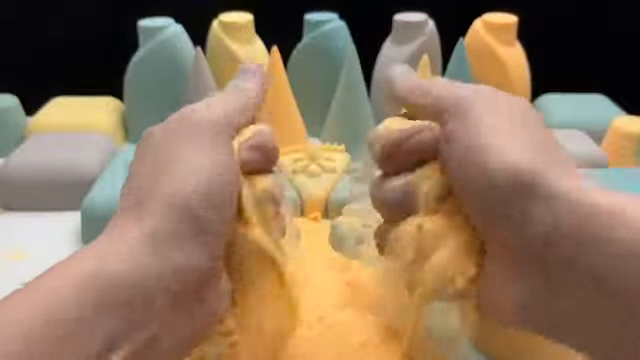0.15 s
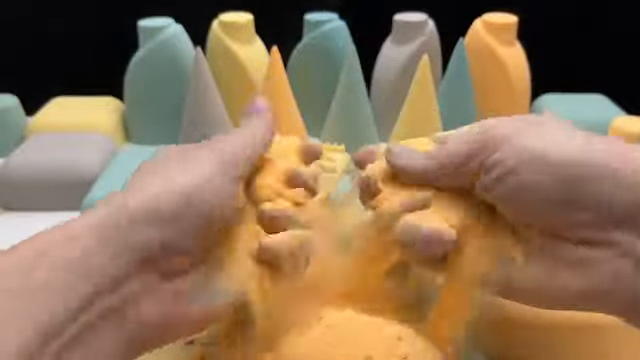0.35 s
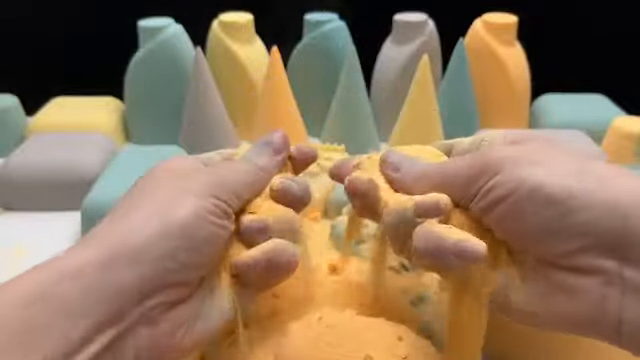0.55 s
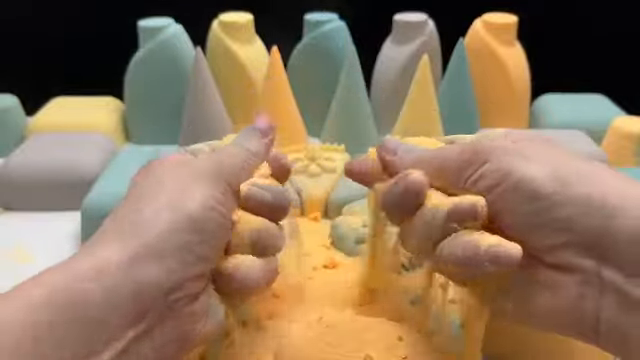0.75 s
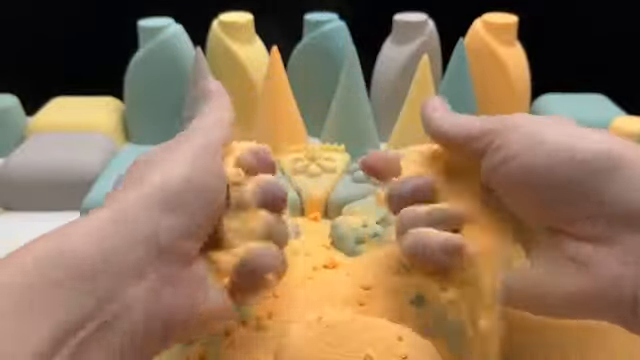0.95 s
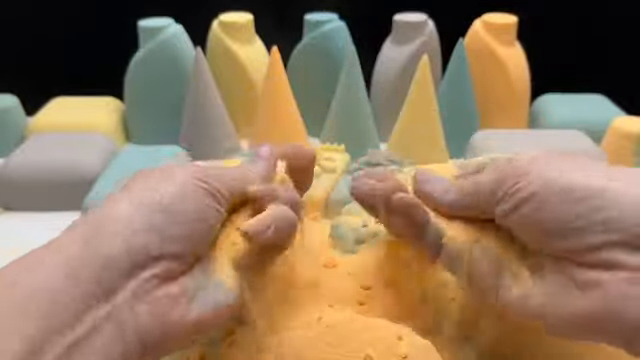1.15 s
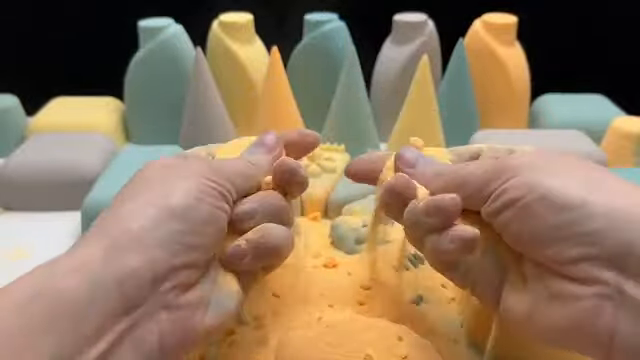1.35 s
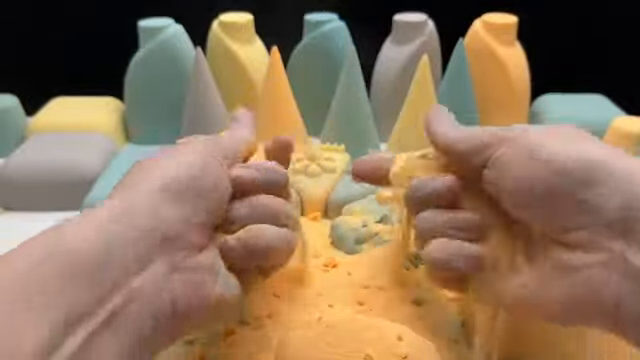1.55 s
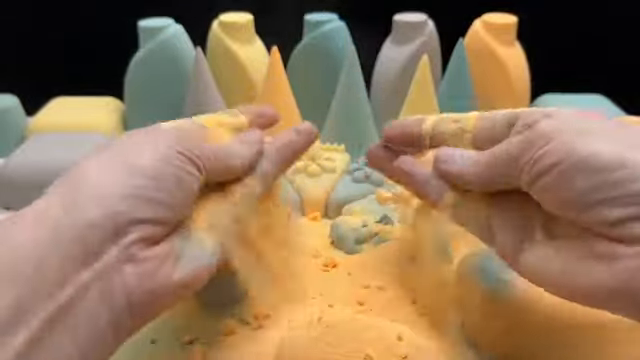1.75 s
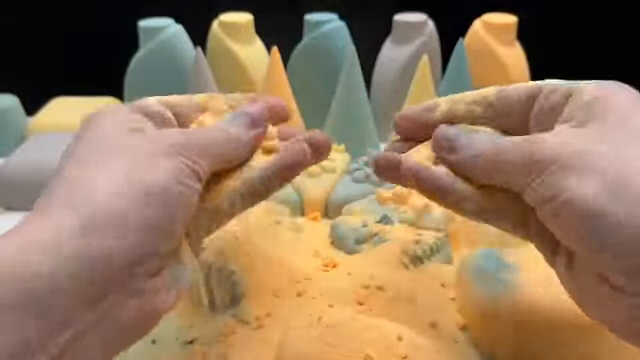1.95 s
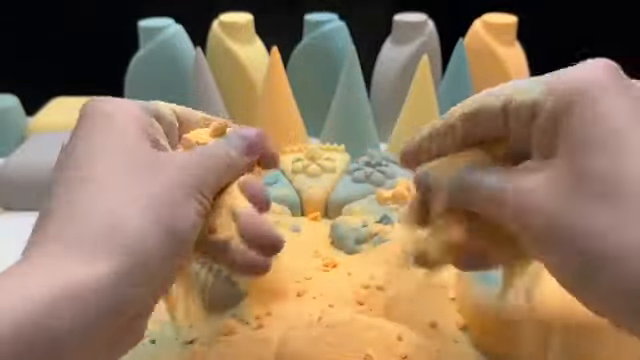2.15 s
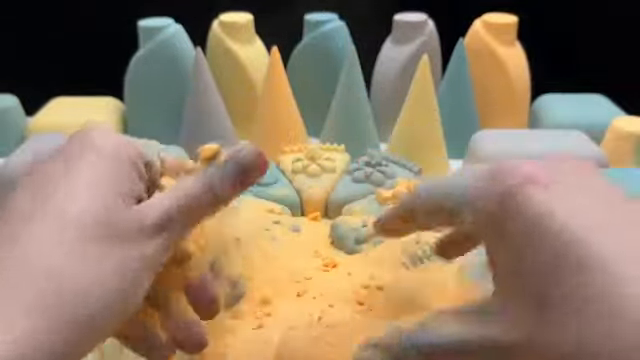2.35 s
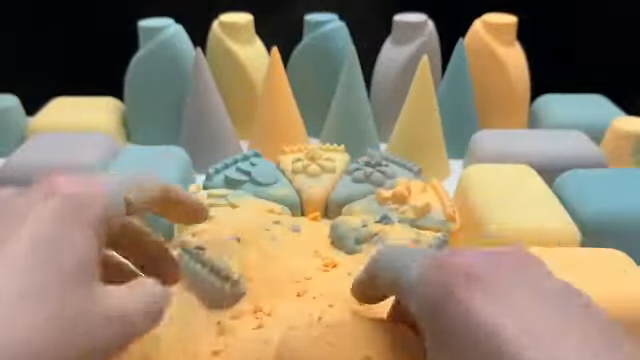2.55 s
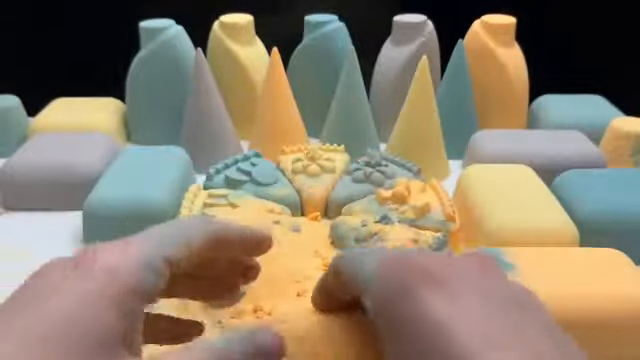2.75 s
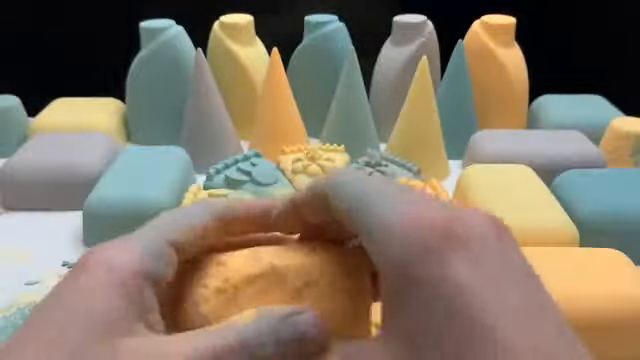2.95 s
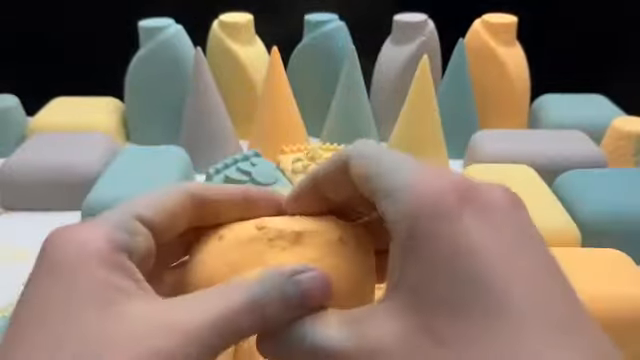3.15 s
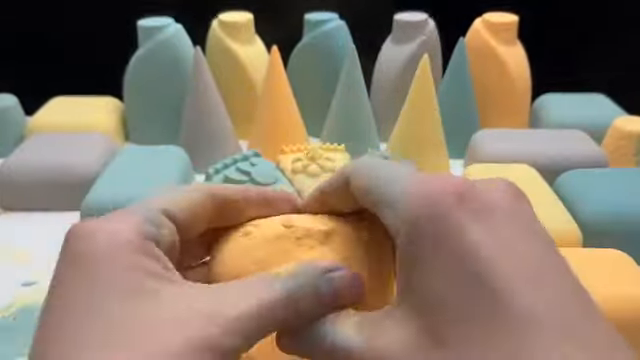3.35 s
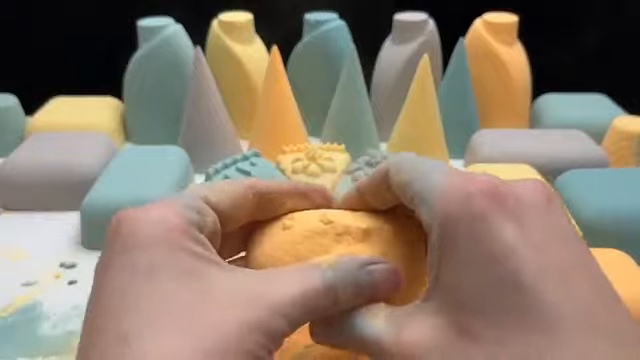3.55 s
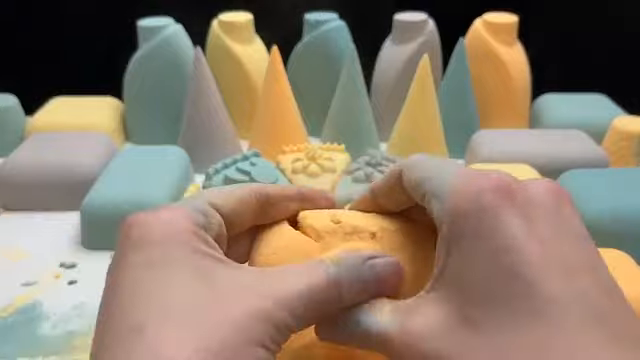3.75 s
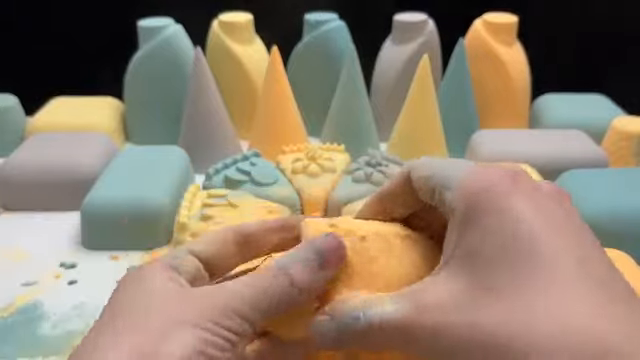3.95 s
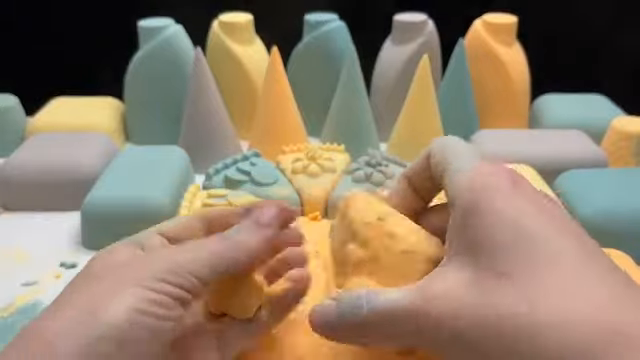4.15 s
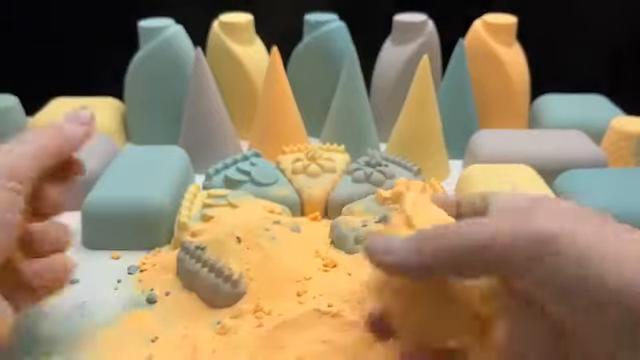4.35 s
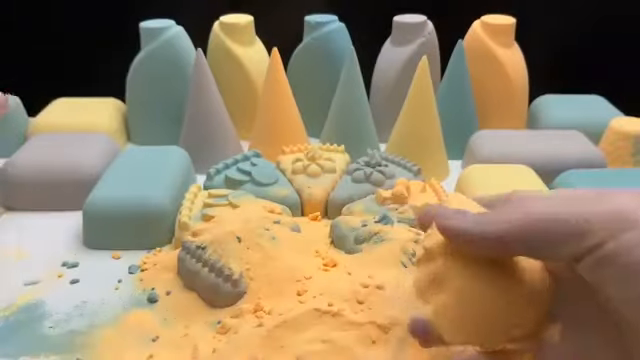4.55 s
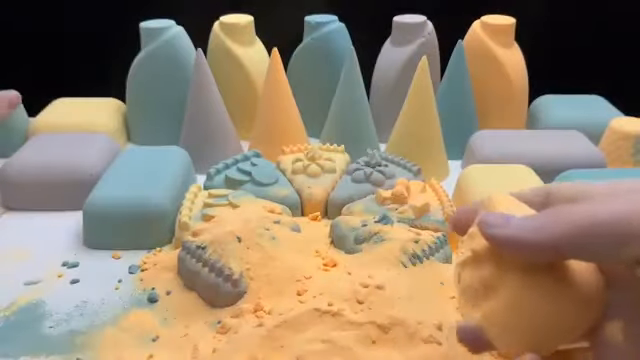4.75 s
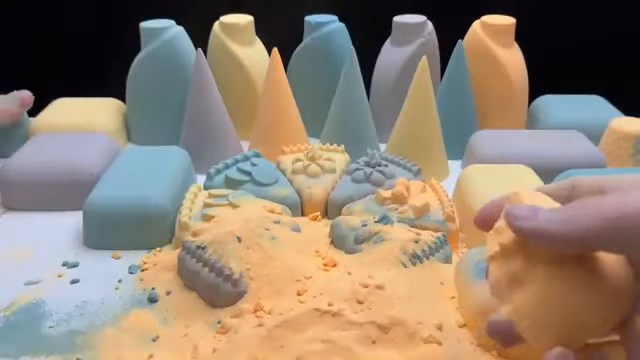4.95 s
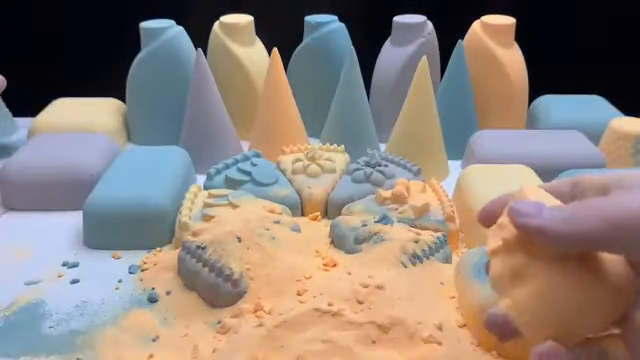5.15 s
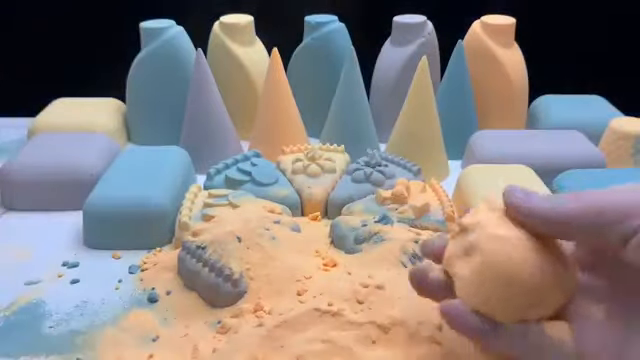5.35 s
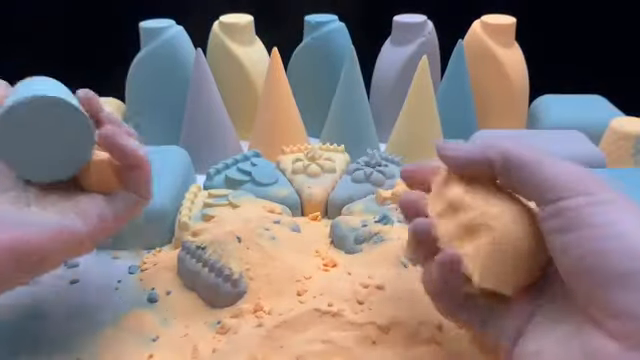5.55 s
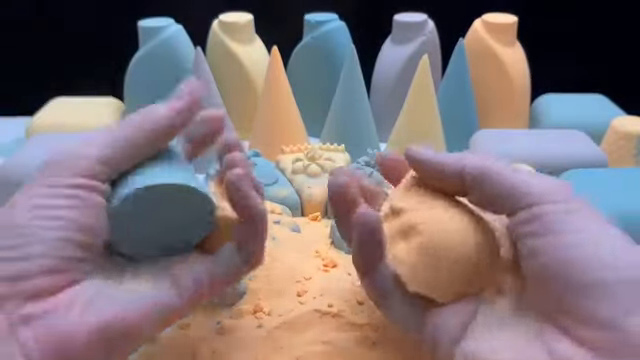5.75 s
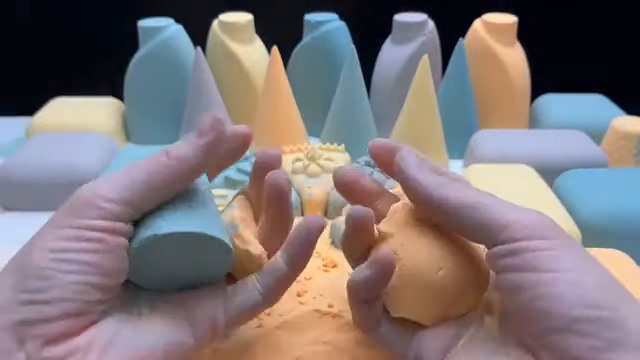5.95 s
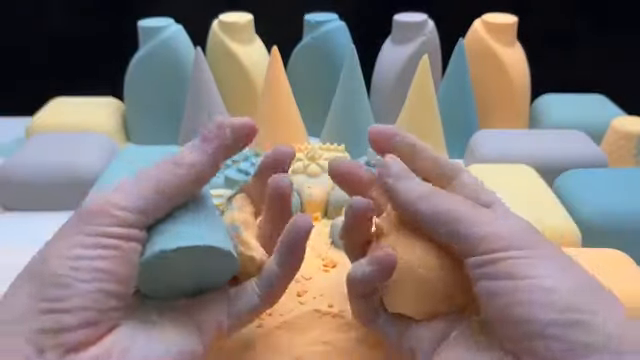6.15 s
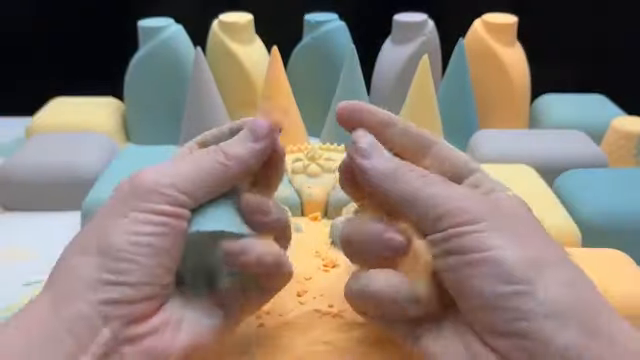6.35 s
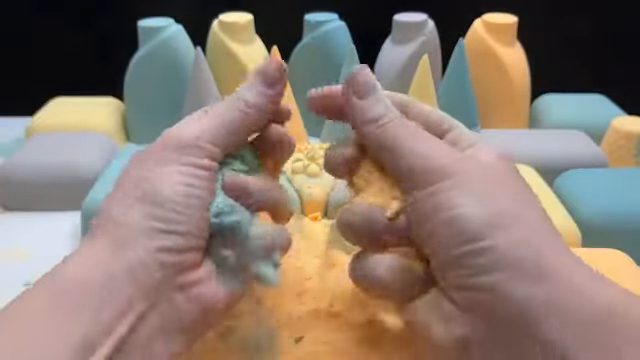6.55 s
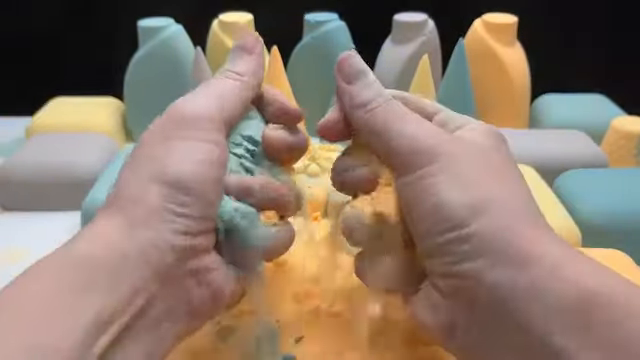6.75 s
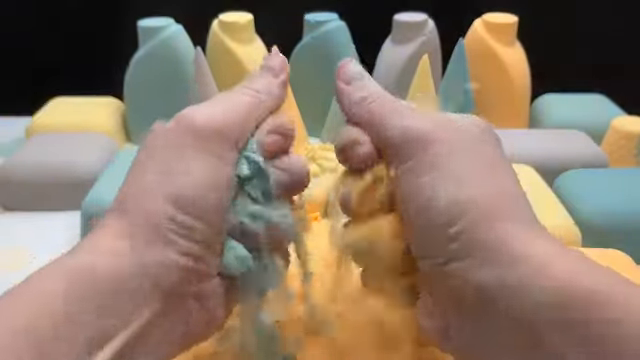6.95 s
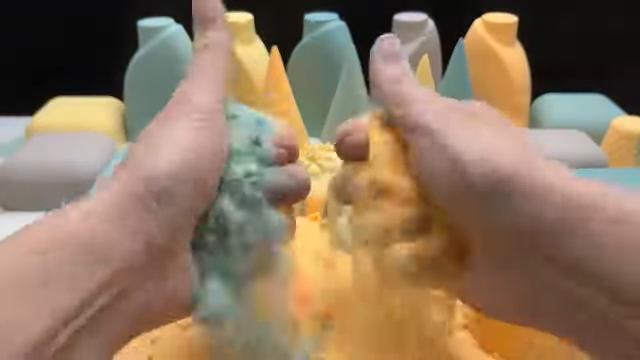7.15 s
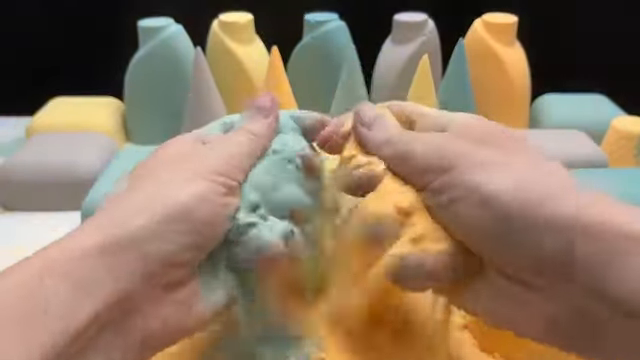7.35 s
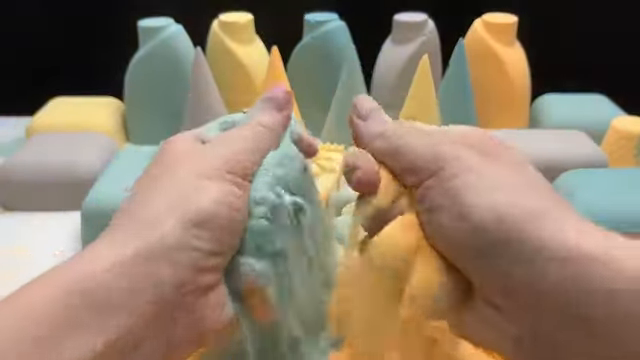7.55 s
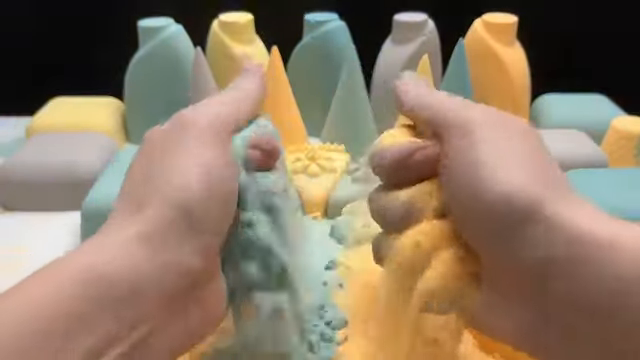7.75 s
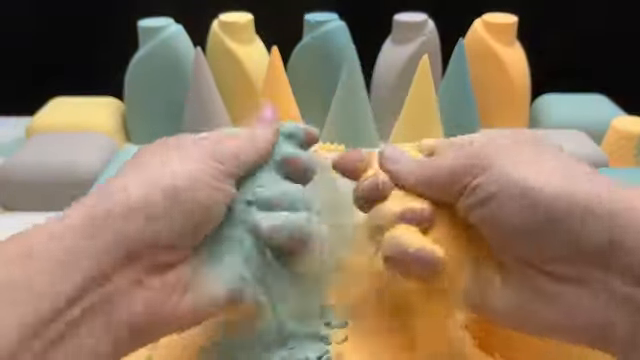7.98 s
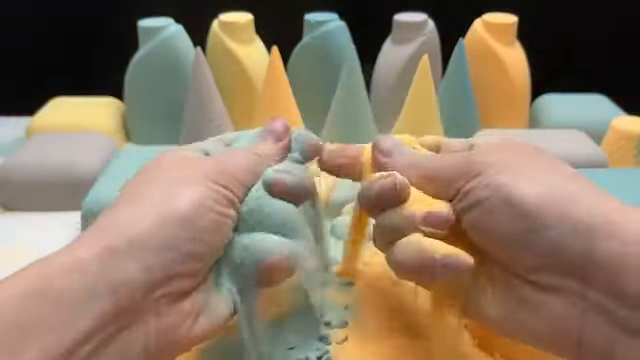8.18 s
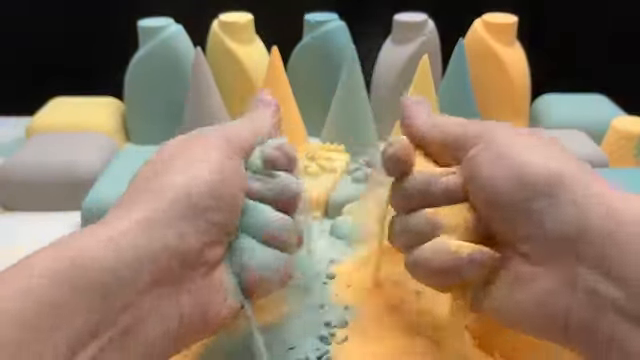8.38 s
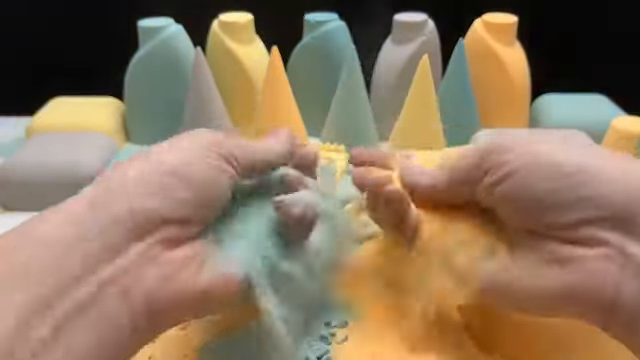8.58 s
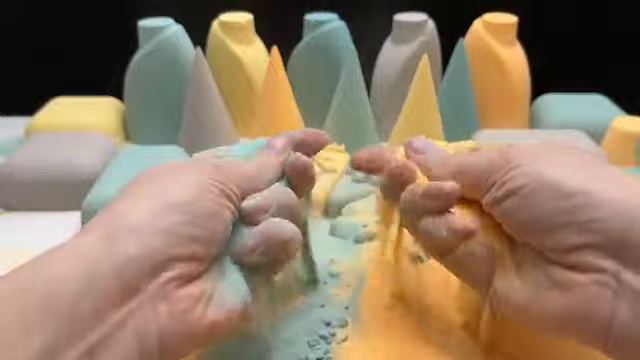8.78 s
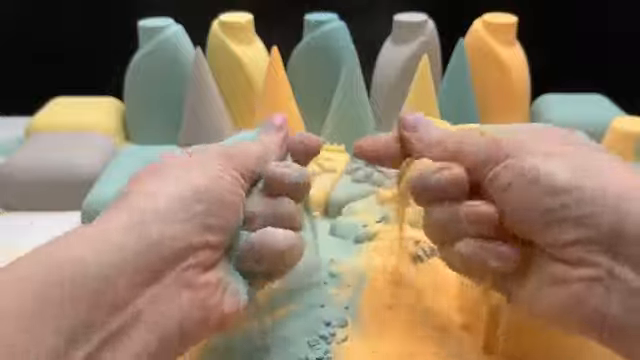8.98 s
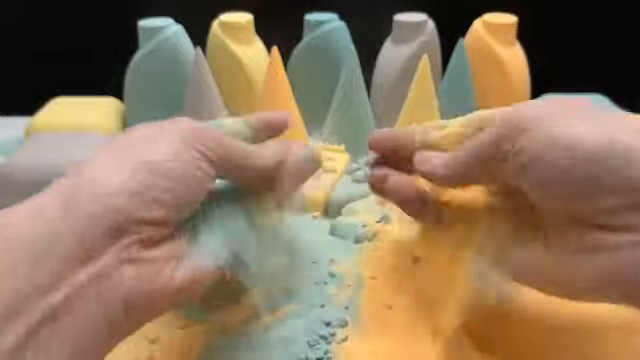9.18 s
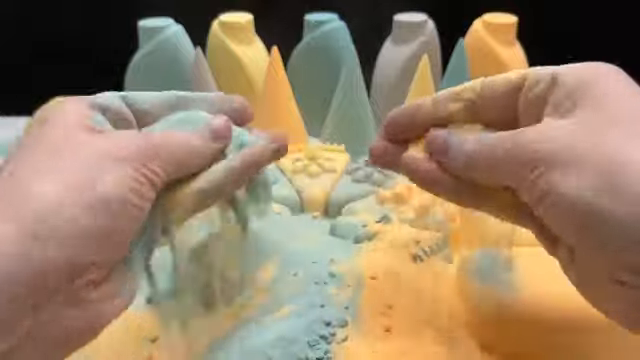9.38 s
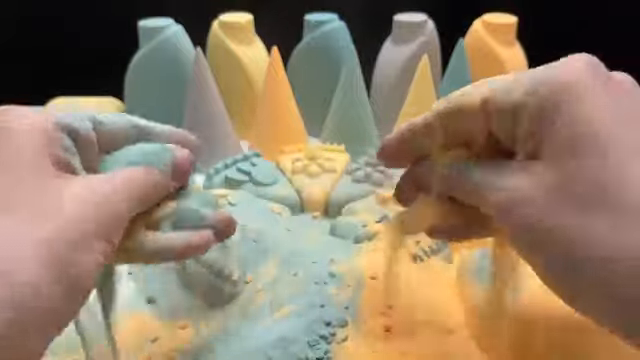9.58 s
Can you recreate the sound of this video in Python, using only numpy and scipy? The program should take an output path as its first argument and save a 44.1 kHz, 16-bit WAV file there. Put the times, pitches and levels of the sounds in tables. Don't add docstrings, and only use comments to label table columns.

```python
import sys
import numpy as np
from scipy import signal
from scipy.fft import rfft, irfft, next_fast_len
from scipy.io import wavfile
from scipy.ndimage import uniform_filter1d

SR = 44100
rng = np.random.default_rng(int(sys.argv[2]) if len(sys.argv) > 2 else 0)


def put_to_file(sound):
    columns = np.atleast_2d(sound).T
    safe = np.clip(columns, -1, 1)
    whole_steps = np.round(safe * 32767)
    wavfile.write(sys.argv[1], SR, whole_steps.astype(np.int16))


def ratio_of_db(decibels):
    return 10 ** (np.asarray(decibels, float) / 20)


N = 424241
SIZE = next_fast_len(N + SR)
HZ = np.arange(SIZE // 2 + 1) * SR / SIZE + 1e-3

# [f/Hz, level/dB per Hz]
CRUMB_TONE = [(90, -16), (150, -11.5), (260, -2), (500, -8), (800, -9), (1200, -12)]


def rms_one(x):
    return x / np.sqrt(np.mean(x ** 2) + 1e-20)


def colour(x, spectrum):
    hz, db = np.transpose(spectrum)
    shape_db = np.interp(np.log(HZ), np.log(hz), db)
    octaves_below = np.maximum(np.log2(hz[0] / HZ), 0)
    octaves_above = np.maximum(np.log2(HZ / hz[-1]), 0)
    gain = ratio_of_db(shape_db - 11.5 * (octaves_below + octaves_above))
    return rms_one(irfft(rfft(x, SIZE) * gain, SIZE)[:N])


def drift(rate):
    r = np.exp(-80 * np.pi * rate / SR)
    noise = rng.standard_normal(N // 40 + 2002)
    slow = rms_one(signal.lfilter([1], [1, -2 * r, r * r], noise)[2000:])
    return np.interp(np.arange(N) / 40, np.arange(len(slow)), slow)


def grains(per_s, spread_db, clump_db, clump_rate):
    sizes = ratio_of_db(spread_db * np.minimum(rng.exponential(1, N), 5))
    signs = rng.choice([-1, 1], N)
    happens = rng.random(N) < per_s / SR
    return sizes * signs * happens * ratio_of_db(clump_db * drift(clump_rate))


def knock(start_hz, end_hz, fall_s, decay_s):
    t = np.arange(SR // 30) / SR
    hz = end_hz + (start_hz - end_hz) * np.exp(-t / fall_s)
    soft_start = 1 - np.exp(-4 * t / fall_s)
    return np.sin(2 * np.pi * np.cumsum(hz) / SR) * np.exp(-t / decay_s) * soft_start


def struck(modes, luck):
    t = np.arange(SR // 12) / SR
    hz, db, t60 = np.transpose(modes)[:, :, None]
    luck = luck[:len(modes), None]
    fading = ratio_of_db(db + 6 * luck - 60 * t / t60)
    ring = (fading * np.sin(2 * np.pi * hz * (1 + 0.08 * luck) * t)).sum(0)
    return ring / np.abs(ring).max()


def twin(x):
    return np.array([x, np.roll(x, N // 3)])


def strokes(s, lasts_s, db, rise, fall, rest_db, builds_db=0):
    t = np.arange(0, N + 64, 64) / SR
    s, lasts_s, db = (np.reshape(c, (-1, 1)) for c in (s, lasts_s, db))
    before = np.maximum(s - t, 0)
    after = np.maximum(t - s - lasts_s, 0)
    shape_db = db - rise * before - fall * after
    shape_db = shape_db - builds_db * np.clip(1 - (t - s) / lasts_s, 0, 1)
    total_db = 10 * np.log10(ratio_of_db(2 * shape_db).sum(0) + ratio_of_db(2 * rest_db))
    return np.interp(np.arange(N) / SR, t, total_db)


def add_db(one_db, other_db):
    return 10 * np.log10(ratio_of_db(2 * one_db) + ratio_of_db(2 * other_db))


def hands():
    # [t/s, crushing lasts/s, pouring lasts/s, crunch level/dB, powder level/dB]
    squeezes = [(0.018, 0.14, 0.25, -45.5, -43), (0.364, 0.17, 0.038, -61, -50.5),
                (0.588, 0.16, 0.33, -44, -43.5), (1.301, 0.091, 0.25, -45.5, -44.5),
                (1.918, 0.12, .2, -48, -45.5), (2.27, 0.038, .02, -63.5, -70),
                (3.403, 0.062, 0.049, -67.5, -62.5), (5.09, 0.04, .02, -62, -75),
                (6.335, .14, 0.17, -47.5, -41.5), (6.544, 0.42, 0.52, -43, -40.5),
                (7.164, 0.16, 0.1, -55, -50), (7.396, 0.27, .16, -47, -43),
                (7.621, 0.11, 0.18, -42.5, -39.5), (8.173, 0.2, 0.31, -45.5, -44.5),
                (8.778, 0.18, .31, -47.5, -43.5), (9.373, 0.068, 0.041, -61.5, -52),
                (9.487, 0.021, 0.24, -54, -47.5)]
    # [t/s, lasts/s, friction level/dB, dust level/dB]
    touches = [(1.167, 0.077, -49, -58.5), (1.812, 0.056, -49, -57.5), (2.709, 0.1, -56.5, -58),
               (3.036, 0.12, -62.5, -53.5), (3.261, 0.2, -63.5, -54), (3.601, 0.019, -50.5, -54),
               (3.677, 0.092, -62, -61.5), (3.843, 0.026, -50, -50), (3.916, 0.077, -58.5, -59),
               (4.096, 0.072, -69, -62), (4.213, 0.045, -60.5, -50), (4.307, .07, -60, -59.5),
               (4.625, 0.034, -69, -62), (4.9, 0.14, -72, -71.5), (5.097, 0.039, -48, -57),
               (5.221, 0.066, -67, -56), (5.449, 0.03, -55, -49.5), (5.578, .06, -50, -44.5),
               (5.692, 0.13, -59, -49), (5.843, 0.22, -65.5, -58), (6.2, 0.15, -68, -50),
               (6.392, 0.034, -32.5, -42.5), (7.906, 0.11, -52.5, -57.5), (8.063, 0.027, -53, -64),
               (0.518, 0.047, -47, -59), (2.162, 0.13, -45, -47), (4.477, 0.054, -68, -66.5)]
    # [t/s, lasts/s, level/dB]
    leans = [
        (1.75, 0.12, -55),
        (4.054, 0.051, -50),
        (4.793, 0.47, -58),
        (6.377, 0.66, -46.5),
    ]
    s, crush_s, pour_s, crunch_db, powder_db = np.transpose(squeezes)
    touch_s, touch_lasts_s, touch_db, touch_dust_db = np.transpose(touches)
    lean_s, lean_lasts_s, lean_db = np.transpose(leans)

    crunch_level = strokes(s, crush_s, crunch_db, rise=230, fall=90, rest_db=-69.5)
    rasp = strokes(s, crush_s, crunch_db - 4, rise=230, fall=122, rest_db=-94)
    touch = strokes(touch_s, touch_lasts_s, touch_db, rise=263, fall=179, rest_db=-78)
    touch_dust = strokes(touch_s, touch_lasts_s, touch_dust_db, rise=263, fall=179, rest_db=-69.5)
    pour = strokes(s, pour_s, powder_db, rise=202, fall=103, rest_db=-120)
    pour_dust = strokes(s, pour_s, powder_db - 3.5, rise=202, fall=103, rest_db=-120, builds_db=3)
    rumble = strokes(np.r_[s, lean_s], np.r_[crush_s, lean_lasts_s], np.r_[crunch_db - 1.5, lean_db],
                     rise=102, fall=61.5, rest_db=-61)
    return crunch_level, rasp, add_db(pour, touch), add_db(pour_dust, touch_dust), rumble


def steady_floor():
    # [f/Hz, level/dB per Hz]
    floor_tone = [(59, -19), (100, -12), (151, 8), (266, -7.5), (1120, -64), (4110, -31), (4650, -8.5),
                  (7000, -66), (9100, -65), (15400, -120)]
    return ratio_of_db(-72) * twin(colour(rng.standard_normal(N), floor_tone))


def table_rumble(rumble_db):
    # [f/Hz, level/dB per Hz]
    hum_tone = [(15, -30), (25, -24), (48, 1), (70, 4), (102, -3), (130, -11), (160, -13.5), (210, -41),
                (350, -120)]
    return ratio_of_db(rumble_db) * twin(colour(rng.standard_normal(N), hum_tone))


def rubs():
    # [t/s, half length/s, body level/dB, hollow-palm whistle level/dB]
    rub_strokes = [
        (2.759, 0.067, -54.5, -82),
        (5.13, 0.03, -73, -54),
    ]
    # [f/Hz, level/dB per Hz]
    rub_tone = [(300, -5), (500, 4), (1000, 0), (1500, -1)]
    palm_hz, palm_width_hz = 1694, 52
    t, noise = np.arange(N) / SR, rng.standard_normal(N)
    body = colour(noise, rub_tone)
    r = np.exp(-np.pi * palm_width_hz / SR)
    palm = rms_one(signal.lfilter([1], [1, -2 * r * np.cos(2 * np.pi * palm_hz / SR), r * r], noise))
    out = 0
    for s, half_s, body_db, palm_db in rub_strokes:
        stroke = np.exp(-((t - s) / half_s) ** 2)
        linger = np.where(t < s, stroke, np.exp(-np.abs(t - s) / 0.051))
        out = out + ratio_of_db(body_db) * stroke * twin(body) + ratio_of_db(palm_db) * linger * twin(palm)
    return out


def lone_clicks():
    # [t/s, level/dB]
    ticks = [
        (2.53, -44.5),
        (3.426, -50),
        (3.455, -50),
        (3.571, -38),
        (3.6071, -32),
        (6.296, -27),
    ]
    t = np.arange(N) / SR
    shape = sum(ratio_of_db(db) * (t > s) * np.exp(-np.abs(t - s) / 0.0025) for s, db in ticks)
    return twin(rng.standard_normal(N)) * shape


def patchy(x, patch_db, rate):
    patch_edges = [2500, 3000, 3600, 4300, 5000, 5600, 6300, 7000]
    lows = [signal.sosfilt(signal.butter(2, hz, fs=SR, output="sos"), x) for hz in patch_edges]
    bands = np.diff([0 * x, *lows, x], axis=0)
    return rms_one(sum(band * ratio_of_db(patch_db * drift(rate)) for band in bands))


def powder(friction_db, dust_db):
    # [f/Hz, level/dB per Hz]
    friction_tone = [(1200, -14.5), (1700, -2.5), (2200, -1), (3300, -1), (5000, -3.5), (7000, -6.5),
                     (8500, -14), (10000, -8)]
    # [f/Hz, level/dB per Hz]
    dust_tone = [(6500, -6.5), (8500, 1), (10000, -4), (12000, -4.5), (14000, -4.5), (15200, -7)]
    grit = rms_one(grains(5000, 2.5, 1.8, 37)) + 0.88 * rng.standard_normal(N)
    friction = twin(patchy(colour(grit, friction_tone), patch_db=4.2, rate=3)) * ratio_of_db(friction_db - 1.5)
    dust = twin(colour(grit, dust_tone)) * ratio_of_db(dust_db + 4.0 + 1.7 * drift(20))
    return friction + dust


def crunch(crunch_db, rasp_db):
    # [f/Hz, level/dB per Hz]
    rasp_tone = [(500, -12.5), (800, -0.5), (1200, -12), (1700, 0.5), (2200, -6)]
    force = np.clip((crunch_db + 73.0) / 14, 0, 1)
    grind = twin(colour(rng.standard_normal(N), CRUMB_TONE)) * ratio_of_db(3.5 * force * drift(25))
    pops = 0
    for size in (.6, .9, 1.4, 2.1):
        small = knock(1600 / size, 330 / size, 0.0012 * size, 0.0026 * size)
        pops = pops + signal.oaconvolve(grains(60, 1.3, 2.1, 39), small)[:N]
    rasp_grit = rms_one(grains(900, 1.7, 9.4, 49)) + 2.25 * rng.standard_normal(N)
    rasp = colour(rasp_grit, rasp_tone)
    low = 0.85 * grind + 0.49 * force * twin(rms_one(pops))
    return ratio_of_db(crunch_db + 3.0) * low + ratio_of_db(rasp_db + 1.5) * twin(rasp)


def splinters(rasp_db):
    # [f/Hz, level/dB per Hz]
    splinter_tone = [(500, -17), (900, 8), (2000, 9), (3300, -6), (5000, -24)]
    force = np.clip((rasp_db + 78) / 14, 0, 1)
    clicks = colour(grains(220, 4, 3, 25), splinter_tone)
    return ratio_of_db(rasp_db - 4.0) * force * twin(clicks)


def one_crack(snap_db, knock_db, hz, thud_db, chance):
    # [f/Hz, level/dB, time to fall 60 dB/s]
    thud_modes = [(116, -3.5, 0.067), (158.3, -1.5, 0.089), (236.3, 0, 0.084), (310, -3, 0.16),
                  (369, -8, 0.044), (469, -22, 0.3)]
    # [f/Hz, level/dB, time to fall 60 dB/s]
    snap_modes = [(1785, 1.5, 0.007), (2250, 3, 0.006), (2880, 3, 0.004), (3730, -4, 0.002),
                  (4730, -12, 0.0026), (11000, -11, .003)]
    thud = ratio_of_db(thud_db - 3.0) * struck(thud_modes, 0.6 * chance[8:])
    t = np.arange(len(thud)) / SR
    thud = thud * (1 - np.exp(-t / 0.0017))
    ring = ratio_of_db(snap_db + 13) * struck(snap_modes, 0.65 * chance) * (1 - np.exp(-t / 0.00023))
    fall = ratio_of_db(knock_db + 2.5) * knock(3.3 * hz, 0.723 * hz, 0.52 / hz, 1.3 / hz)
    fall = fall + ratio_of_db(snap_db - 0.6) * knock(3600 * 2 ** (.22 * chance[7]), 1500, .0008, .0011)
    fall = fall + ratio_of_db(thud_db - 6) * knock(602, 126.5, 0.00397, 0.016)
    return ring + np.pad(fall, (0, len(t) - len(fall))) + thud


def cracks():
    # [t/s, snap level/dB, knock level/dB, thud level/dB]
    lumps = [(.1046, -24.5, -27, -30), (.1227, -22, -17, -25.5), (.5852, -35, -22, -15),
             (.6673, -21, -17.5, -17), (6.2965, -45, -31, -36.5), (1.2907, -21, -21.5, -20),
             (1.3432, -21.5, -22, -31.5), (1.3634, -24, -23, -25.5), (1.379, -22.5, -45, -26),
             (1.9182, -17, -30.5, -30), (3.6065, -19, -20.5, -29), (6.3674, -25.5, -21, -25.5),
             (6.534, -25, -20, -22.5), (6.6016, -20, -18.5, -27), (6.7448, -23.5, -19.5, -15.5),
             (6.7644, -20.5, -18, -33), (6.8229, -16, -26, -11.5), (6.8278, -19, -14.5, -21),
             (6.8581, -12, -21, -12), (6.8745, -18, -16, -27), (6.957, -21.5, -33, -16.5),
             (6.98, -24.5, -26, -32), (7.6961, -26, -17, -25.5), (7.7915, -22.5, -18.5, -22),
             (8.1591, -26.5, -17.5, -19), (8.2115, -37, -20, -25), (8.224, -32, -26, -21),
             (8.2454, -26.5, -21, -24), (8.77, -16, -14.5, -21), (8.8701, -24.5, -23, -25)]
    # [t/s, snap level/dB, knock level/dB]
    chips = [(0.0489, -35, -29), (6.437, -26, -25), (.6256, -51, -35), (.6517, -40, -28), (.7028, -39, -38),
             (.7104, -28.5, -35), (1.9776, -31, -31), (1.9842, -29, -24), (2.0192, -29, -27),
             (6.7984, -39, -25), (6.3896, -19, -15.5), (6.4119, -24, -20), (6.6471, -24.5, -22.5),
             (6.684, -33, -21.5), (6.7824, -23.5, -19), (6.8954, -23, -22.5), (6.9498, -24, -24.5),
             (7.4224, -42, -30), (7.5479, -29.5, -23), (7.643, -23.5, -23.5), (7.6505, -22, -22),
             (7.7437, -40, -19.5), (8.309, -26.5, -23), (8.798, -22, -22.5), (8.8077, -33, -26),
             (8.8277, -26.5, -47), (8.9434, -27, -25.5), (9.4937, -35, -28.5), (9.5035, -27, -34),
             (9.516, -26.5, -36)]
    out, slump = np.zeros((2, N + SR)), np.zeros(N)
    chip_breaks = [(s, snap_db, knock_db, knock_db - 10) for s, snap_db, knock_db in chips]
    breaks = list(lumps) + chip_breaks
    luck = rng.standard_normal((len(breaks), 2, 16))
    for (s, snap_db, knock_db, thud_db), (chance, other) in zip(breaks, luck):
        hz = 400 * 2 ** np.clip((knock_db - thud_db) / 19, 0, 1)
        direct = one_crack(snap_db, knock_db, hz, thud_db, chance)
        echo_hz = hz * 2 ** (0.21 * other[7])
        echo = one_crack(snap_db, knock_db, echo_hz, thud_db, other) * np.sign(other[6])
        at = round((s - .0005) * SR)
        out[0, at:at + len(direct)] += direct
        out[1, at:at + len(direct)] += 1.05 * np.roll(echo, round(.0007 * SR))
        slump[at] = ratio_of_db(knock_db - 19.5)
    fading = signal.lfilter([1], [1, -np.exp(-1 / (0.041 * SR))], slump + 1e-18)
    crumbs = colour(rms_one(grains(500, 3.8, 2.3, 28)) + 0.6 * rng.standard_normal(N), CRUMB_TONE)
    return out[:, :N] + fading * twin(crumbs)


def gentle_dip(x):
    dip_hz, dip_width_hz = 1500, 450
    return x - .4 * signal.lfilter(*signal.iirpeak(dip_hz, dip_hz / dip_width_hz, SR), x)


def ports(pair):
    # [f/Hz, share of power]
    direct_share = [(60, .96), (250, .9), (700, .8), (1400, .6), (2100, .83), (3000, .76), (4500, .76),
                    (6300, .74), (8300, .93), (11700, .93), (14000, .85)]
    # [f/Hz, phase/rad]
    left_lead = [(0, 0), (1300, .4), (2200, 0), (4300, -.3), (6300, -1.3), (8300, -3.14), (11800, -6.28),
                 (15000, -9.2)]
    hz, part = np.transpose(direct_share)
    share = np.clip(np.interp(np.log(HZ), np.log(hz), part), 0, 1)
    sides = np.array([[1], [-1]])
    lead = np.exp(.5j * sides * np.interp(HZ, *np.transpose(left_lead)))
    direct, scattered = rfft(pair, SIZE)
    both = np.sqrt(share) * direct + sides * np.sqrt(1 - share) * scattered
    return irfft(lead * both, SIZE)[:, :N]


def scene():
    crunch_db, rasp_db, friction_db, dust_db, rumble_db = hands()
    background = table_rumble(rumble_db) + steady_floor()
    breaking = lone_clicks() + crunch(crunch_db, rasp_db) + splinters(rasp_db) + cracks()
    bass_cut = signal.butter(2, 45, "high", fs=SR, output="sos")
    breaking = signal.sosfilt(bass_cut, breaking)
    return ports(gentle_dip(breaking + powder(friction_db, dust_db)) + rubs() + background)


def thin_treble(dry):
    window = np.sin(np.pi * (np.arange(2048) + .5) / 2048)
    pair = np.array([dry[0] + dry[1], dry[0] - dry[1]]) / 2
    hz, _, frames = signal.stft(pair, SR, window, 2048, 1024)
    hz = hz[:-1, None]
    bin_power = np.abs(frames[:, :1024]) ** 2
    power = np.repeat(bin_power.reshape(2, 64, 16, -1).sum(axis=2), 16, axis=1)
    weak = (power < ratio_of_db(2 * -6.5) * power[::-1]) & (hz > 1800)
    dust = power[0, (hz[:, 0] > 10000) & (hz[:, 0] < 14000)].mean(axis=0)
    fine, wide = (uniform_filter1d(uniform_filter1d(bin_power, bins, 1), 4, 2) for bins in (7, 64))
    starved = (16 * wide < ratio_of_db(2 * -1) * dust) & (fine < ratio_of_db(2 * -2) * wide)
    weak |= starved & (hz > 2500) & (hz < 7500)
    above = hz > np.reshape([14650, 15000], (2, 1, 1))
    frames[:, :1024] *= ~(weak | above)
    mid, side = signal.istft(frames, SR, window, 2048, 1024)[1][:, :N]
    return np.array([mid + side, mid - side])


def top_cut(x):
    return signal.sosfilt(signal.butter(12, 15800, fs=SR, output="sos"), x)


def record(dry):
    mix = thin_treble(dry)
    return top_cut(mix)


dry = scene()
out = record(dry)
put_to_file(out)
```